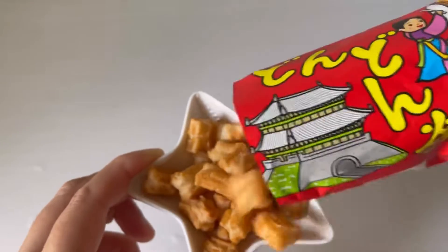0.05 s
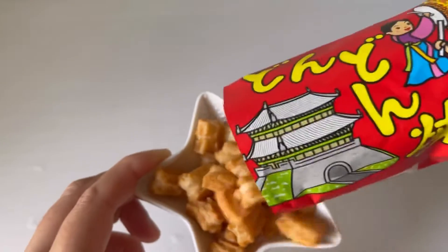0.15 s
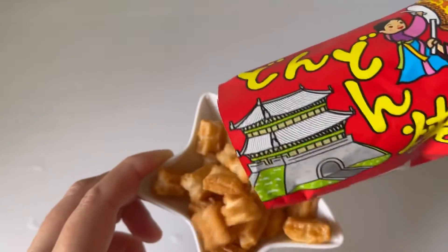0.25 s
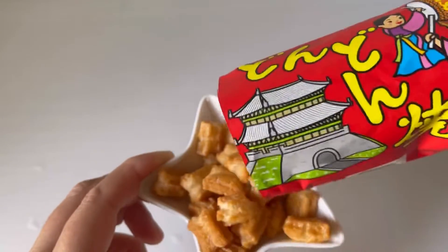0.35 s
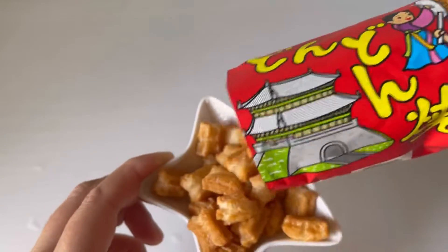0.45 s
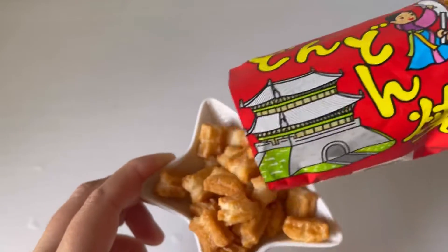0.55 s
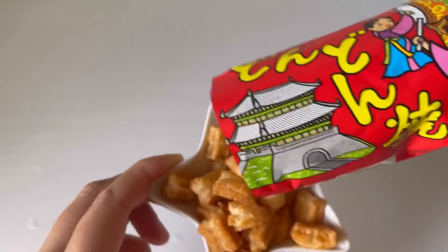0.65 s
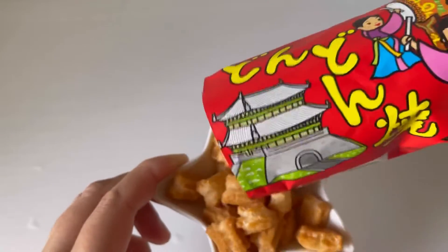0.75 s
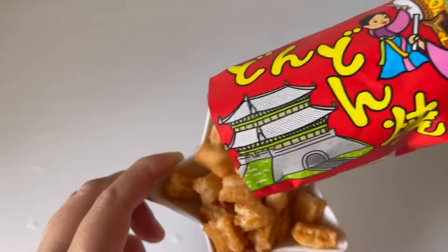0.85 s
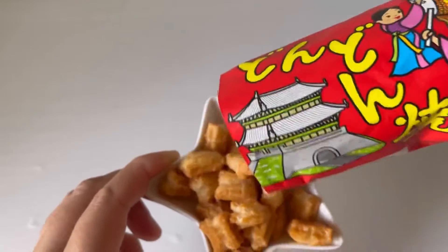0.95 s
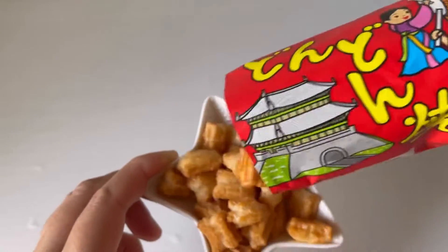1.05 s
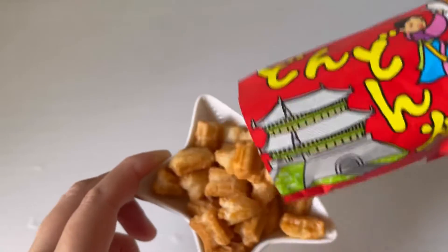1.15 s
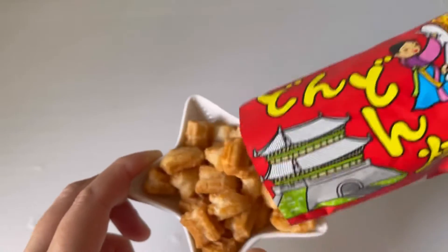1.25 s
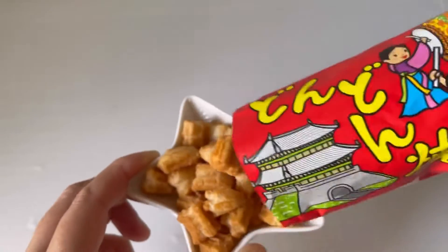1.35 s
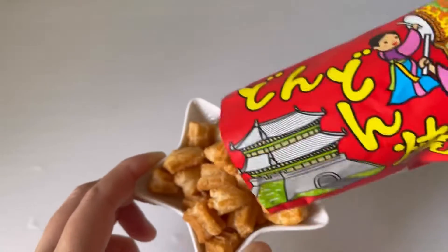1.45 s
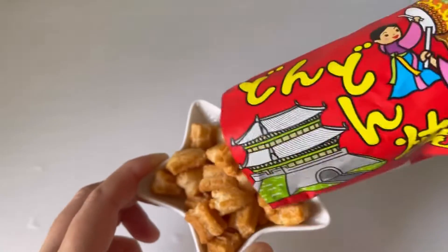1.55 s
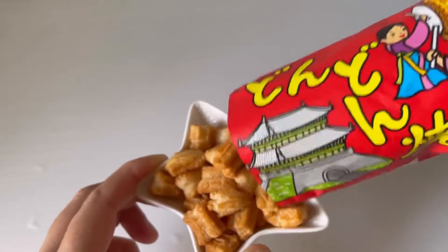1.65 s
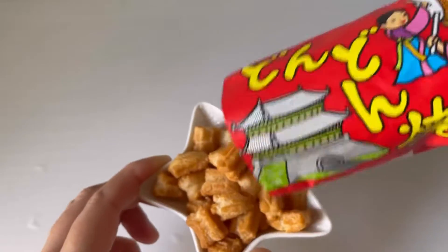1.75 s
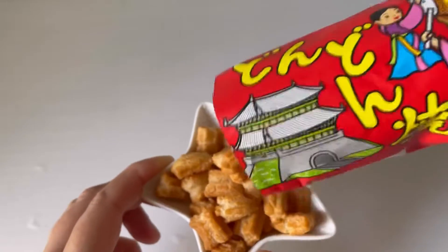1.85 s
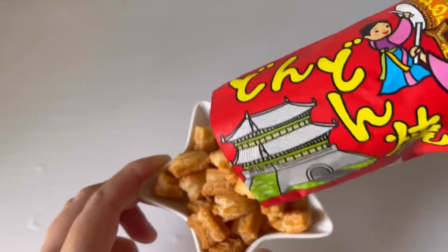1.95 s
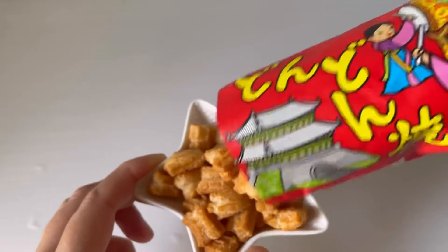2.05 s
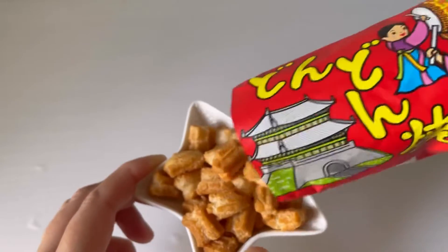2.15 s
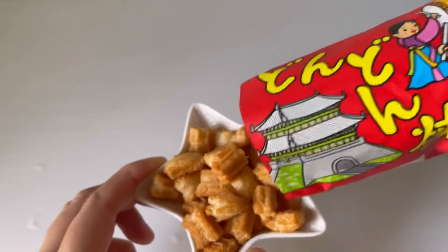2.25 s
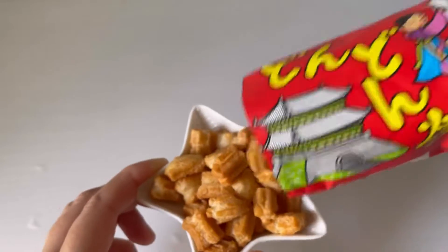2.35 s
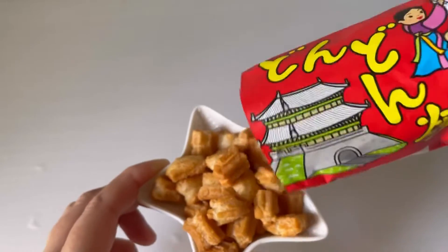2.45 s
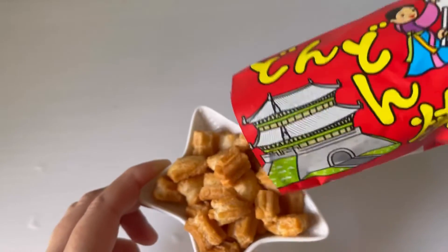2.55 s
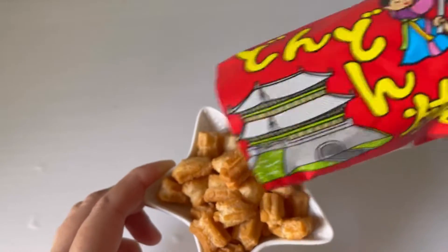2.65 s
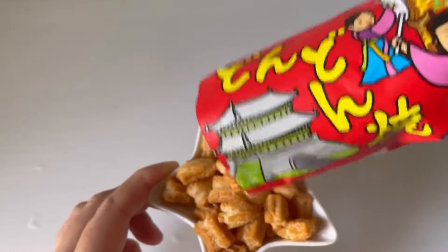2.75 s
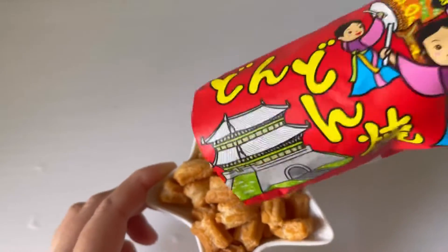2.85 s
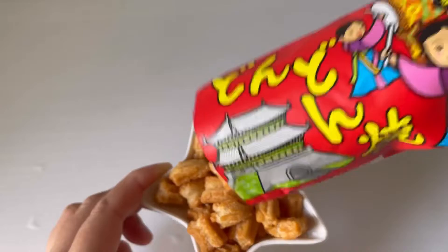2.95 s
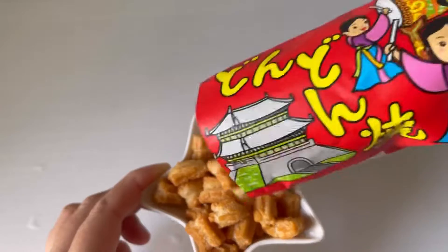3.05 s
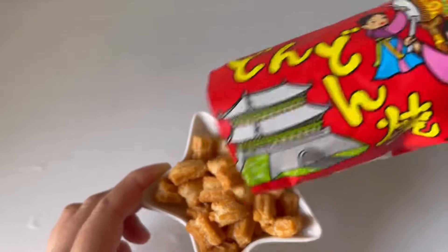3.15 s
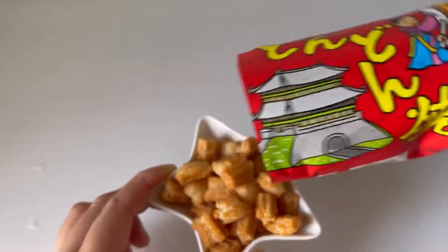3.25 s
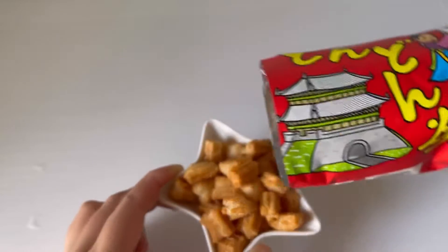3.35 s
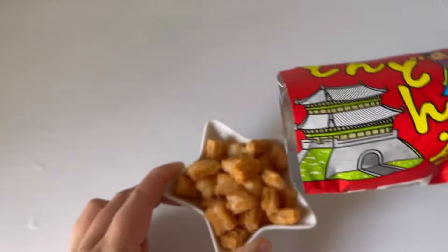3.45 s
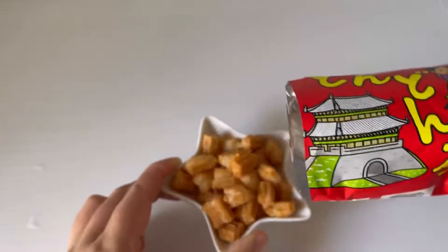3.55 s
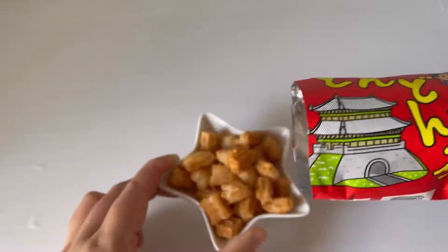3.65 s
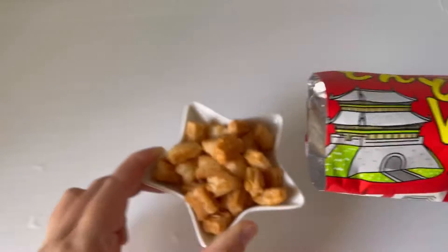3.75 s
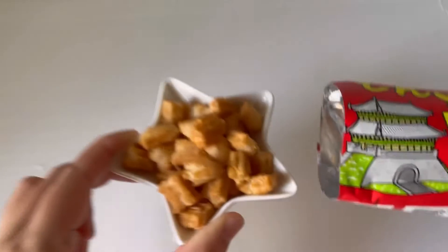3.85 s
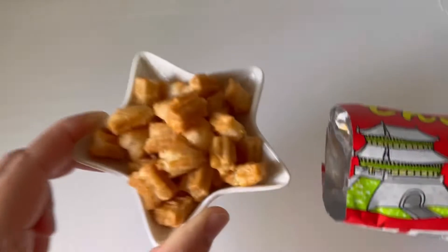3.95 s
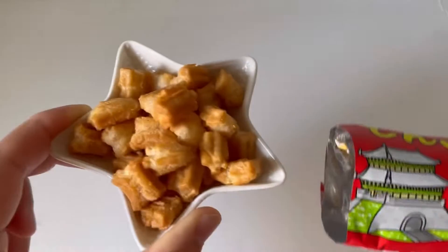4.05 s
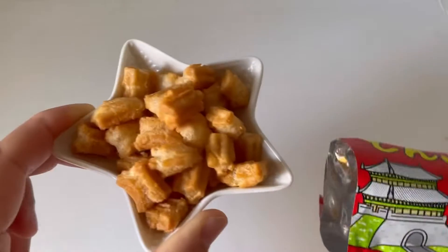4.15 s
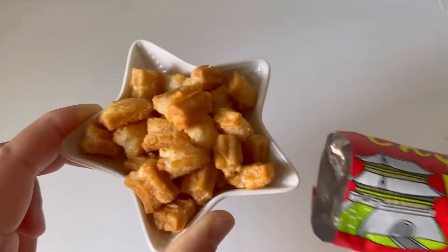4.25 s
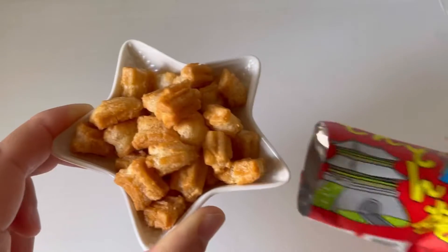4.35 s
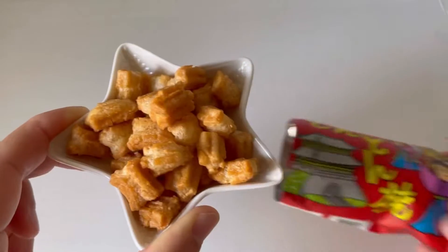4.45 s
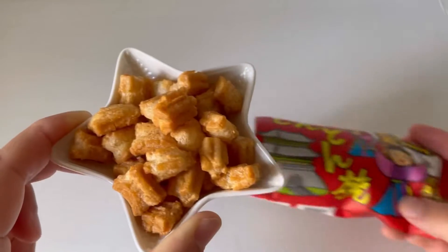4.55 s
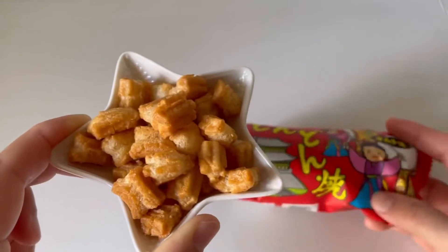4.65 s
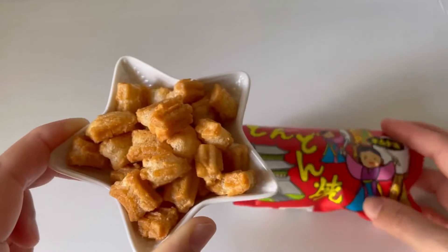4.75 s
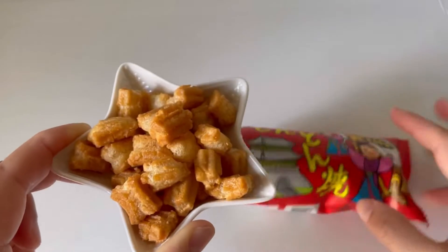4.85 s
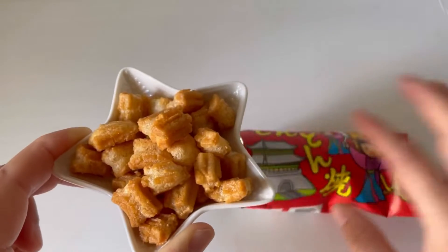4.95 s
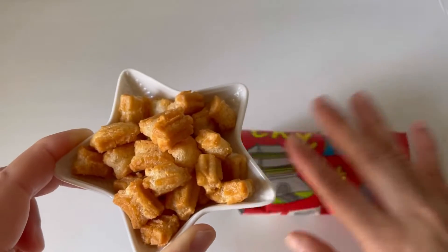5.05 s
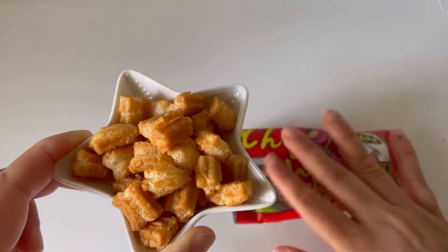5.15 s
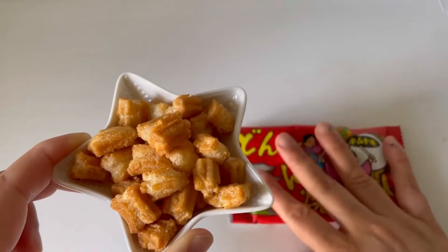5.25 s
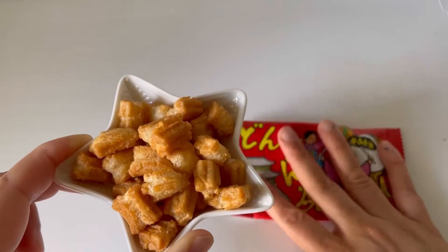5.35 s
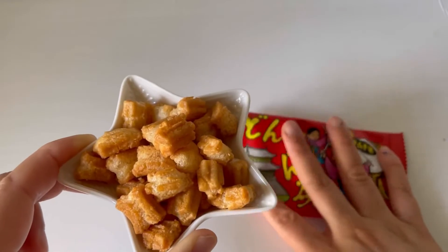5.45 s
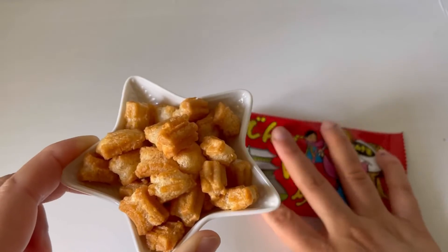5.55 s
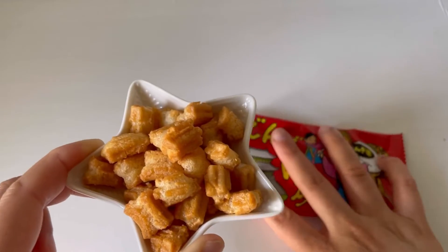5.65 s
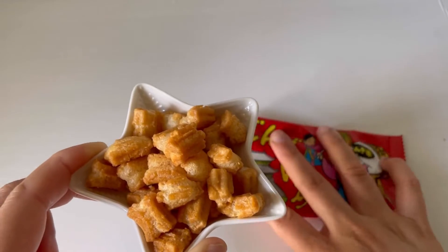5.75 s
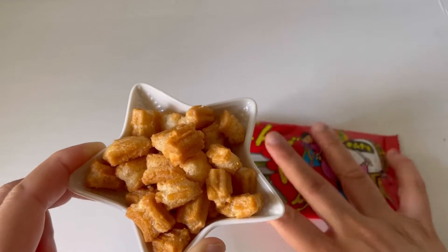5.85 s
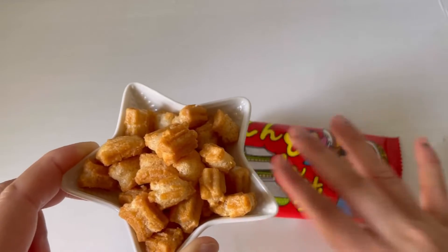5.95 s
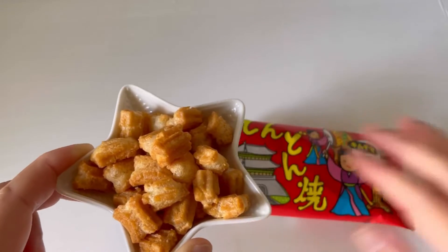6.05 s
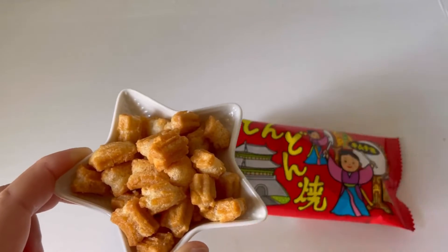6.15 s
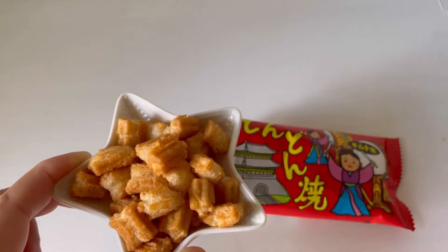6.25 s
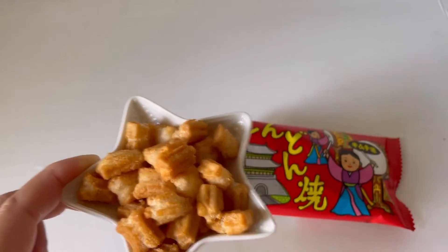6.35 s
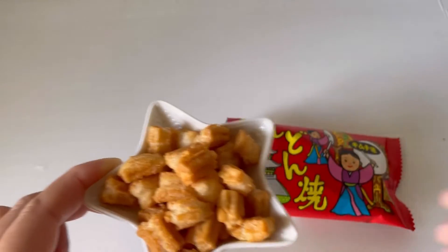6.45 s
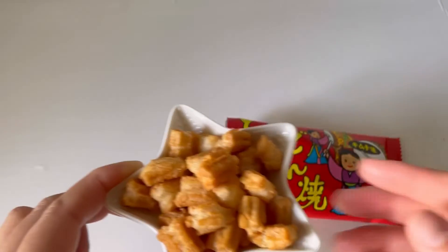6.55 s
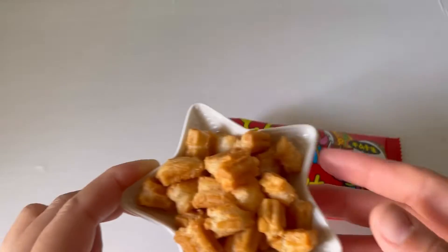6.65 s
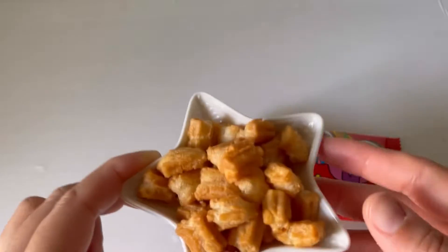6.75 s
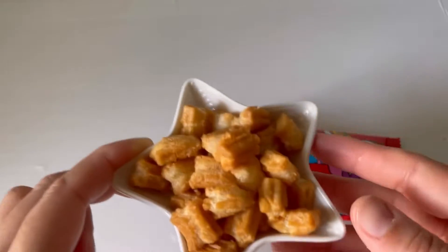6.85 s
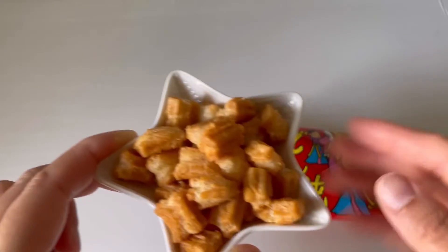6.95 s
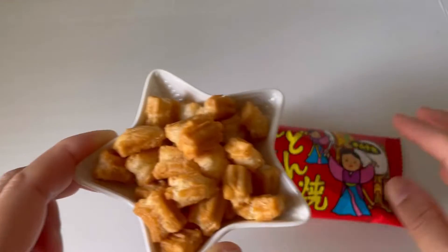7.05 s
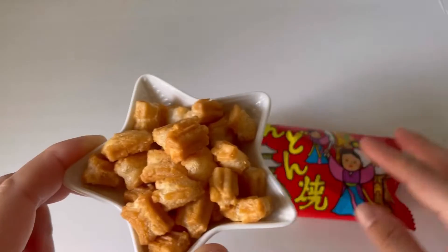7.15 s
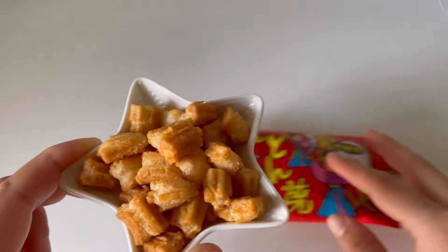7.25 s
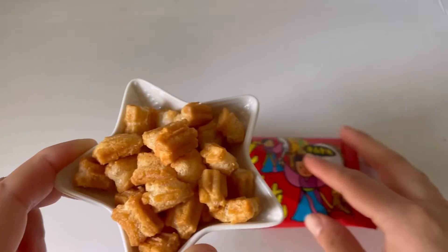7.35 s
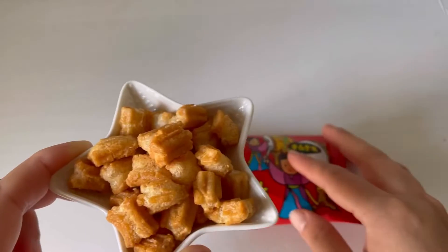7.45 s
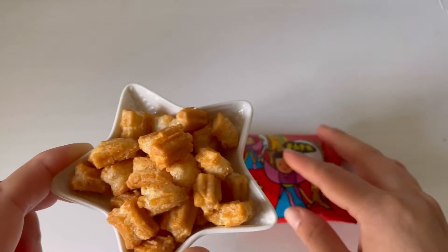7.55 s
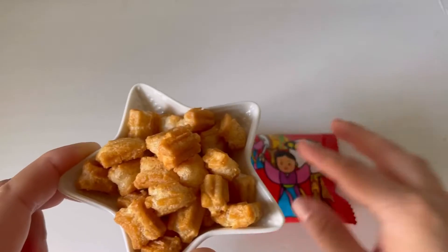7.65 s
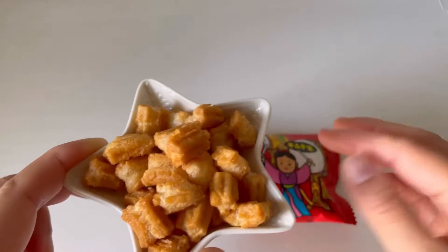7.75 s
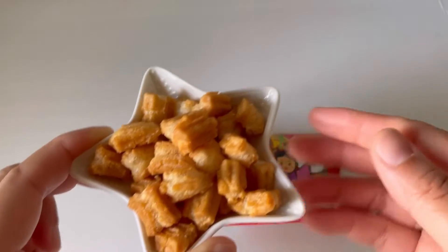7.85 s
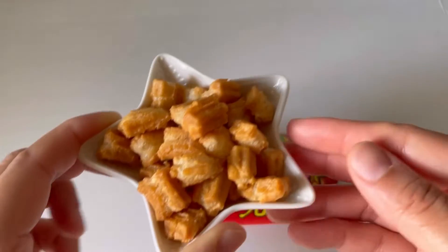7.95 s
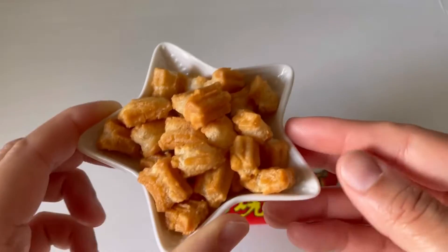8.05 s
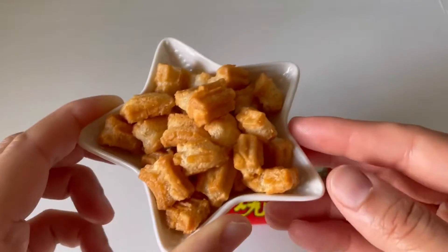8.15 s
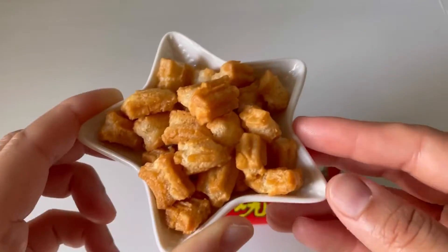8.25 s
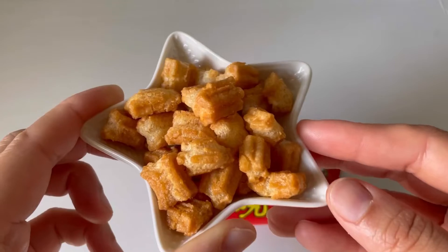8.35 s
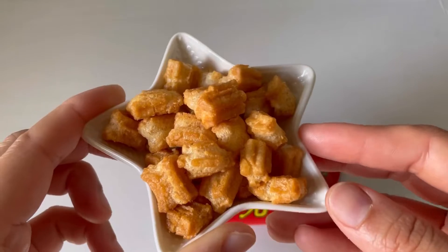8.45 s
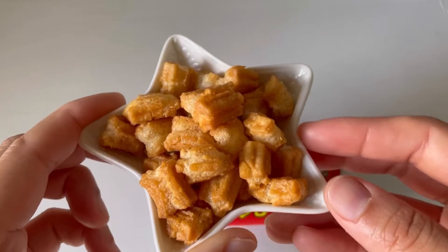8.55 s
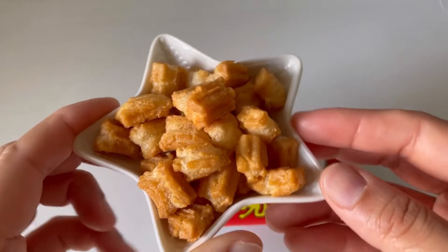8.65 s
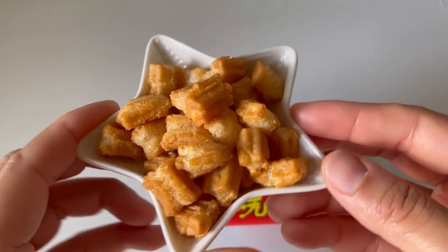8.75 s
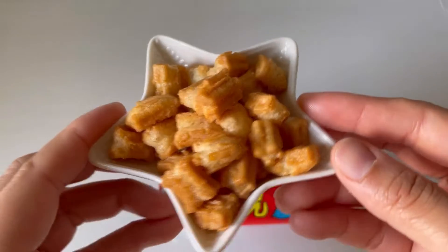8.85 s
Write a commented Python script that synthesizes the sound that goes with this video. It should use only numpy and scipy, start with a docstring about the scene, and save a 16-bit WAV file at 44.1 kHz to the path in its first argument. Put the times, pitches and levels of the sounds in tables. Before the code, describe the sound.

Crisp puffed crackers knock and slide softly from a plastic bag into a dish, then the empty bag crackles loudly as it is pressed flat.

```python
"""Crisp crackers knock and slide as they are shaken out of a plastic bag into a small dish.
Then the empty bag is laid on the table, pressed flat and pushed aside: creases snap, fingers tap the film dully.
Blows are bursts of noise with a ring, a broad body and a crack; rustle is many tiny ticks over a hiss.
Soft pushes draw short low tones from the table. Below it all lie short reflections and the noise and hums
of a quiet room. Two microphone ports listen from close by."""
import sys
import numpy as np
from scipy import signal
from scipy.fft import rfft, irfft, next_fast_len
from scipy.io import wavfile
from scipy.ndimage import uniform_filter1d

SR = 44100
rng = np.random.default_rng(int(sys.argv[2]) if len(sys.argv) > 2 else 0)


def wav_out(sig):
    """Save sig, one row per channel (or a flat mono array), as 16-bit PCM at SR to the path in sys.argv[1]."""
    wavfile.write(sys.argv[1], SR, np.round(np.clip(np.atleast_2d(sig).T, -1, 1) * 32767).astype(np.int16))


def voltage_ratio(decibels):
    """Convert decibels (scalar or array-like) to amplitude ratios, 20 dB per decade."""
    exponent = np.asarray(decibels, float) / 20
    return 10 ** exponent


N = 392049   # length of the scene in samples

# room noise, relative spectrum: (frequency [Hz], level per Hz [dB])
AIR_SPECTRUM = [(33, -34.5), (42, -13), (60, 1), (102, -8), (151, -16.5), (200, -19.5), (301, -17),
                (425, -23.5), (748, -25), (826, -21), (981, -29.5), (2320, -30.5), (3600, -38.5),
                (5500, -53.5), (9000, -57.5), (11000, -68), (12300, -48.5), (13300, -62), (14000, -76)]
# how alike the room noise is at the two ports: (frequency [Hz], likeness [0-1])
AIR_LIKENESS = [(60, 1.), (170, 0.87), (345, 0.83), (550, 0), (1200, .3), (1800, 0.4), (3000, 0.2),
                (6000, 0), (12000, 0)]
# wavering hums in the room: (frequency [Hz], width [Hz], rms level [dB])
ROOM_HUMS = [(49.8, 5, -57.5), (98.7, 3.9, -59.5), (146, 8.6, -69.5), (363.3, 17, -70)]
# hand and bag pushing on the table top; the level is the one from which the tone starts to die:
# (time [s], level [dB], frequency [Hz], time to die by 60 dB [s])
TABLE_THUMPS = [(4.813, -29, 368, 0.069), (4.828, -31, 138, .1), (5.24, -35, 140.8, 0.21),
                (5.369, -31.5, 135.5, 0.29), (5.529, -31, 136.5, 0.11), (7.13, -40, 139.9, 0.21)]
# shakes, pushes and rubs of the bag that make it rustle, and at the end a faint rub of a finger on the dish,
# before the added flutter: # (start [s], held [s], body level [dB], treble relative to body [dB])
BAG_MOVES = [(0.0, 0.19, -49, -2.5), (0.239, 0.13, -55, -1), (0.45, 0.14, -62.5, -3),
             (0.64, 0.22, -52.5, -4), (0.799, .1, -53, 0.5), (0.96, 0.25, -60, 0), (1.2, .13, -55.5, -5.5),
             (1.37, 0.095, -57.5, -2.5), (1.7, 0.031, -62.5, -8.5), (1.8, .03, -63, 0),
             (1.845, 0.075, -51.5, -5.5), (2.05, 0.12, -64, -5.5), (2.22, .15, -67, -2.5),
             (2.5, 0.093, -74, 0), (2.7, 0.017, -61, -5), (2.838, 0.015, -62, -4), (2.95, 0.034, -65, -6),
             (3.06, .02, -82, -1), (3.13, .03, -81, -2), (3.86, 0.037, -70.5, -1), (4.19, 0.069, -62, -6),
             (4.54, .01, -71.5, 1.5), (4.617, 0.11, -60, 1.5), (4.785, 0.13, -53.5, -4.5),
             (5.0, .01, -66.5, -3), (5.032, .02, -56.5, -4), (5.059, 0.076, -43, -9),
             (5.131, 0.11, -37, -7.5), (5.335, 0.05, -42, 0), (5.43, 0.15, -48.5, 0.5),
             (5.57, 0.11, -54, -8.5), (5.721, 0.19, -48, -3), (6.059, 0.13, -58, -4.5),
             (6.22, 0.14, -57, -11), (7.197, 0.12, -48, -2.5), (7.29, .12, -52, -3.5),
             (7.42, 0.059, -56.5, -4), (7.51, .015, -68.5, 2.5), (7.675, .01, -77.5, 1.5),
             (8.6, 0.033, -83.5, -5.5), (8.82, .07, -84, -3)]
# relative spectra of cracks and treble, of crackers and of film: (frequency [Hz], level per Hz [dB])
TREBLE_SPECTRUM = [(3500, -2), (5000, 1.5), (7000, -3), (9500, 3), (12500, -2.5), (13600, -6.5),
                   (14600, -13.5), (16000, -21.5)]
CRACKER_SPECTRUM = [(130, -4), (250, 2), (500, -4), (1000, -7), (1400, -4), (2100, -8), (3000, -7),
                    (4300, -30.5)]
FILM_SPECTRUM = [(150, -12.5), (300, -13.5), (600, -11.5), (1000, -10.5), (1500, -8.5), (2100, -9.5),
                 (3000, -13), (4300, -16)]
# the clearest snaps of the film's creases and dull finger taps on it, each level taken over its loudest 3 ms:
# (time [s], body rms level [dB], ring frequency [Hz], treble relative to body [dB])
FILM_SNAPS_AND_TAPS = [(3.924, -55.5, 1800, -4), (4.228, -55, 1910, -6), (4.237, -29.5, 1690, -14.5),
                       (4.451, -39, 955, -26), (4.62, -37.5, 1766, -3.5), (4.645, -38.5, 860, -14),
                       (4.785, -36, 1280, -6.5), (4.812, -28.5, 790, -10.5), (4.844, -33, 1578, -5.5),
                       (4.889, -39.5, 762, -7), (4.937, -44.5, 1499, -5), (5.051, -24.5, 1002, -20.5),
                       (5.084, -30.5, 1401, -9.5), (5.106, -27, 1217, -22.5), (5.118, -32, 1605, -14),
                       (5.124, -30, 1560, -13), (5.131, -21.5, 1250, -24.5), (5.141, -13, 1360, -10.5),
                       (5.164, -31, 1728, 2.5), (5.188, -21.5, 1010, 0), (5.204, -22.5, 3380, -2),
                       (5.218, -18.5, 1674, -9), (5.235, -27.5, 1710, -8.5), (5.241, -24.5, 1770, 1),
                       (5.259, -30.5, 1750, -9.5), (5.302, -41.5, 1370, -13.5), (5.325, -30, 1650, -14.5),
                       (5.341, -25, 1394, -7.5), (5.35, -23, 2200, 1), (5.365, -27, 840, -7.5),
                       (5.379, -25, 1778, 2), (5.405, -32.5, 3150, 9), (5.44, -28, 1820, 6),
                       (5.472, -34, 2230, -9.5), (5.482, -35.5, 1820, 1.5), (5.496, -29, 1395, 5),
                       (5.506, -28, 3200, 5), (5.535, -29, 3910, -6.5), (5.566, -41, 1806, -9),
                       (5.58, -37.5, 2230, 6.5), (5.609, -44, 1564, -10), (5.632, -29.5, 1780, -5.5),
                       (5.687, -47, 537, -20.5), (5.729, -35, 2280, 10), (5.765, -48, 1843, 8.5),
                       (5.777, -34, 3270, 9), (5.784, -34, 3330, 2), (5.801, -30, 1642, 4.5),
                       (5.811, -28, 1800, 1), (5.829, -34, 1800, -17), (5.845, -38, 1450, -2),
                       (5.86, -27.5, 1540, 0), (5.897, -44.5, 1480, -16), (5.92, -26, 2180, -5),
                       (5.995, -48, 1080, -10), (6.064, -27, 1450, 3), (6.077, -30, 1416, -10),
                       (6.112, -24.5, 1518, -6.5), (6.162, -44, 1056, -27.5), (6.224, -25.5, 1358, -0.5),
                       (6.309, -28.5, 1220, -14), (6.317, -34, 830, -37), (7.214, -43.5, 1370, -18),
                       (7.26, -40, 1440, -10), (7.302, -50.5, 1720, 7), (7.323, -40.5, 1500, -7.5),
                       (7.348, -34.5, 1330, -41), (7.44, -41.5, 1360, -28), (7.493, -49, 1070, -13),
                       (7.591, -45.5, 1450, -39.5), (7.61, -45, 1380, -39.5)]
# the clearest knocks of crackers on each other and on the bag, each level taken over its loudest 3 ms:
# (time [s], body rms level [dB], ring frequency [Hz], treble relative to body [dB])
CRACKER_KNOCKS = [(0.021, -36, 734, 0.5), (0.042, -33.5, 2800, -2.5), (0.082, -47, 2800, -10),
                  (0.113, -42.5, 2820, -2), (0.151, -51, 1300, -12), (0.18, -36, 1320, -27),
                  (0.2, -49, 2190, 5), (0.248, -54, 510, 3), (0.277, -51, 2450, -9),
                  (0.332, -47.5, 2940, 0), (0.353, -47.5, 2160, -4.5), (0.37, -42, 1210, -8),
                  (0.395, -52, 1220, -10), (0.435, -48, 1250, -11), (0.462, -44.5, 500, -2),
                  (0.495, -52, 1730, 1), (0.573, -52.5, 1040, -20), (0.654, -46, 1250, -7),
                  (0.673, -46.5, 1110, -26), (0.698, -45, 715, -24), (0.737, -40, 1230, -8.5),
                  (0.822, -45.5, 1690, -9), (0.881, -47.5, 1730, -3), (0.981, -49, 1360, -21),
                  (1.001, -48, 1640, -13), (1.069, -52.5, 1670, 3), (1.086, -51, 2740, -14),
                  (1.149, -51, 1180, 1), (1.218, -45.5, 1640, -16), (1.241, -54, 1400, -15),
                  (1.262, -44, 1700, -4.5), (1.303, -40.5, 500, -9), (1.426, -54, 510, -5),
                  (1.459, -53, 1230, 0), (1.717, -54.5, 1500, -1), (1.808, -56, 1680, -4),
                  (1.853, -52, 1300, -7), (1.864, -43, 500, -4), (1.899, -59, 510, 8),
                  (1.916, -42, 1750, -5), (2.054, -52, 510, -27), (2.123, -53, 1460, -4),
                  (2.201, -70, 2390, 7), (2.234, -61, 740, 1), (2.261, -47.5, 1630, -3.5),
                  (2.312, -58, 510, 3.5), (2.337, -73, 2000, 2), (2.355, -66.5, 2000, 4),
                  (2.376, -51.5, 2040, 9), (2.502, -60.5, 510, 3.5), (2.518, -62.5, 2900, 14),
                  (2.626, -59, 1350, -8), (2.713, -64, 2360, 5), (2.73, -51, 527, -3),
                  (2.849, -50.5, 1210, -7), (2.966, -59, 800, -6)]
# resonances of the microphone ports: (frequency [Hz], width [Hz], gain [dB])
PORT_RESONANCES = [(1170, 300, -0.5), (2230, 260, 1), (2800, 200, 2), (4794, 590, -6), (5470, 410, 3.5),
                   (11000, 1800, -0.5)]
# phase by which the left port leads the right: (frequency [Hz], lead [radians])
PORT_LEAD = [(60, -0.18), (130, -0.01), (300, 0.42), (600, 1.03), (1000, 0.48), (1500, -0.18), (2600, 0.5),
             (4200, 1), (4650, 1), (5100, 0.89), (5900, 0.74), (7200, 1), (8700, 3), (9700, 3.5),
             (10700, 3), (12000, 4.5), (13000, 5), (13800, 4.5), (16000, 10)]


def rms_one(x):
    """Scale to rms 1."""
    return x / np.sqrt(np.mean(x ** 2) + 1e-20)


def loudest_one(x):
    """Scale so that the loudest three milliseconds have rms 1."""
    return x / np.sqrt(uniform_filter1d(x ** 2, size=132).max())


def at_hz(points, hz):
    """Read a (frequency, value) table on a log frequency axis."""
    table_hz, values = np.array(points).T
    return np.interp(np.log(hz + 1), np.log(table_hz), values)


def colour(x, spectrum):
    """Shape the last axis by a spectrum that falls away steeply beyond its ends."""
    size = next_fast_len(x.shape[-1])
    hz = np.arange(size // 2 + 1) * SR / size
    closed = [(spectrum[0][0] / 2, -80), *spectrum, (spectrum[-1][0] * 1.3, -80)]
    return irfft(rfft(x, size) * voltage_ratio(at_hz(closed, hz)), size)[..., :x.shape[-1]]


def drift(rate):
    """Slow random wandering: points of spread 1, rate of them per second, joined by lines."""
    points = rng.standard_normal(4000)
    return np.interp(np.arange(N) * rate / SR, np.arange(len(points)), points)


def resonate(x, hz, width_hz):
    """Ring like a struck object: a two-pole resonance with gain 1 on top."""
    r = np.exp(-np.pi * width_hz / SR)
    feedback = [1, -2 * r * np.cos(2 * np.pi * hz / SR), r * r]
    return signal.lfilter(np.array([1, 0, -1]) * (1 - r * r) / 2, feedback, x)


def air():
    """Room noise arrives from all sides, most alike at both ports in the bass; the hums waver."""
    noise_db = -56.5   # rms level around which the noise drifts
    size = next_fast_len(N)
    alike = np.clip(at_hz(AIR_LIKENESS, np.arange(size // 2 + 1) * SR / size), 0, 1)
    mid, side = rfft(colour(rng.standard_normal((2, N)), AIR_SPECTRUM), size)
    # the side part enters the two ports with opposite signs
    both_ports = np.sqrt(1 + alike) * mid + np.sqrt(1 - alike) * side * [[1], [-1]]
    noise = irfft(both_ports, size)[:, :N]
    hums = sum(voltage_ratio(db) * rms_one(resonate(rng.standard_normal(N), hz, width_hz))
               for hz, width_hz, db in ROOM_HUMS)
    return voltage_ratio(noise_db + 2.7 * drift(3.6)) * rms_one(noise) + hums


def room(x):
    """Dense reflections are like noise that dies away, only partly alike at the two ports."""
    t60_s, wall_cut_hz = 0.21, 17640
    shared = 0.6   # likeness of the two tails
    t = np.arange(SR // 2) / SR
    tails = rng.standard_normal((2, len(t))) * voltage_ratio(-60 * t / t60_s) * (t > .003)
    tails = signal.sosfilt(signal.butter(1, wall_cut_hz, fs=SR, output="sos"), tails)
    tails = shared * tails[:1] + np.sqrt(1 - shared ** 2) * tails
    tails = tails / np.sqrt(np.sum(tails ** 2, axis=1, keepdims=True))
    return signal.fftconvolve(x[None], tails, axes=1)[:, :N]


def thumps():
    """The table top answers a soft push with a short low tone."""
    out, t = np.zeros(N), np.arange(N) / SR
    for s, level_db, hz, t60_s in TABLE_THUMPS:
        since = np.maximum(t - s, 0)
        soft_onset = 1 - np.exp(-since * hz / 2.5)
        out += voltage_ratio(level_db - 60 * since / t60_s) * soft_onset * np.sin(2 * np.pi * hz * since)
    return out


def movement():
    """Body and treble level of the rustle in dB: the loudest move at each moment."""
    # a rustle sets in before its start and dies after its hold
    swell_db_per_s, fade_db_per_s = 1301.5, 219.5
    t = np.arange(N)[::64] / SR
    s, held, body_db, treble_db = np.transpose(BAG_MOVES)[:, :, None]
    before_start = np.maximum(s - t, 0)
    after_hold = np.maximum(t - s - held, 0)
    shape = -swell_db_per_s * before_start - fade_db_per_s * after_hold
    return [np.repeat(np.max(db + shape, axis=0), 64)[:N] for db in (body_db, body_db + treble_db)]


def patches(ticks, count):
    """Ticks are dealt at random to small patches, each ringing a few cycles at its own pitch."""
    low_hz, high_hz, cycles = 605, 4070, 5.0
    dealt = rng.integers(0, count, N)
    out = np.zeros(N)
    for k, hz in enumerate(np.geomspace(low_hz, high_hz, count)):
        out += resonate(ticks * (dealt == k), hz, hz / cycles) / np.sqrt(hz)
    return rms_one(out)


def rustle():
    """Crackers and film rub in dense small ticks of uneven size, coming in clumps, over a smooth sliding hiss."""
    ticks_per_s, size_db = 2500, 4.5
    clump_db, clump_rate = 3.0, 70   # spread of the clumps, and their random points per second
    hiss_db, patch_ring_db = 0.5, -3   # both relative to the ticks
    body_db, treble_db = movement()
    sizes = voltage_ratio(size_db * np.minimum(rng.exponential(1, N), 4)) * rng.choice([-1, 1], N)
    ticks = rms_one(sizes * (rng.random(N) < ticks_per_s / SR))
    hiss = voltage_ratio(hiss_db) * rng.standard_normal(N)
    grain = voltage_ratio(clump_db * drift(clump_rate)) * (ticks + hiss)
    ringing = patches(voltage_ratio(clump_db * drift(clump_rate)) * ticks, count=10)
    rung = grain + voltage_ratio(patch_ring_db) * ringing
    pouring = np.arange(N) < 3.5 * SR   # crackers until 3.5 s, then the film alone
    body = np.where(pouring, rms_one(colour(rung, CRACKER_SPECTRUM)), rms_one(colour(rung, FILM_SPECTRUM)))
    treble = rms_one(colour(grain, TREBLE_SPECTRUM))
    # body and treble also flutter on their own, so that the colour keeps changing
    return voltage_ratio(body_db + 2.4 * drift(50)) * body + voltage_ratio(treble_db + 2.5 * drift(50)) * treble


def lesser(start_s, end_s, over_db, spread_db, longest_ms, count):
    """Lesser blows fall at random, their levels following the movement, each with its own pitch, edge and length."""
    low_ring_hz, ring_octaves, edge_spread_db = 500, 2, 13.5
    body_db, treble_db = movement()
    when, size, pitch, edge, swell, die = rng.random((count, 6)).T
    s = start_s + (end_s - start_s) * when
    at = (s * SR).astype(int)
    level_db = body_db[at] + over_db + spread_db * (size - .5)
    ring_hz = low_ring_hz * 2 ** (ring_octaves * pitch)
    crack_db = treble_db[at] - body_db[at] + edge_spread_db * (edge - .5)
    return list(zip(s, level_db, ring_hz, crack_db, longest_ms * swell ** 2, longest_ms * die))


def blows(events, material, width_hz, ring_db, treble_share):
    """Each blow is a burst of tiny slips that swells and dies: a ring at its own pitch, a broad body, a crack."""
    dull_share = 0.3   # a blow with little treble also has less broad body beside its ring (dB per dB)
    lead = 1280   # samples of room for the swell
    out, ms = np.zeros(N + 4 * lead), np.arange(-lead, 2 * lead) * 1000 / SR
    slips = rng.standard_normal((len(events), 2, 3 * lead))
    for (s, level_db, hz, crack_db, swell_ms, die_ms), (low, high) in zip(events, slips):
        # swell and die times each span 20 dB
        slope = np.where(ms < 0, 20 * ms / max(swell_ms, .3), -20 * ms / max(die_ms, 1))
        broad = colour(low * voltage_ratio(slope), material)
        ring = voltage_ratio(ring_db) * resonate(broad, hz, width_hz)
        body = voltage_ratio(dull_share * min(crack_db, 0)) * broad + ring
        # the crack swells and dies faster than the body
        crack = colour(high * voltage_ratio(slope / treble_share), TREBLE_SPECTRUM)
        blow = loudest_one(body) + voltage_ratio(crack_db) * loudest_one(crack)
        at = round(s * SR)
        out[at:at + len(ms)] += voltage_ratio(level_db) * blow
    return out[lead:lead + N]


def film_snaps_and_taps():
    """Creases in the film snap over, bright or dull, and fingers tap it dully; lesser blows join the clear ones."""
    swell_ms, die_ms = 2.9, 5.4
    film_blows = [(*row, swell_ms, die_ms) for row in FILM_SNAPS_AND_TAPS]
    film_blows += lesser(4.6, 6.9, over_db=2.5, spread_db=7, longest_ms=8, count=30)
    film_blows += lesser(7.2, 7.5, over_db=-3.5, spread_db=3, longest_ms=6.3, count=16)
    return blows(film_blows, FILM_SPECTRUM, width_hz=510, ring_db=8.0, treble_share=0.89)


def cracker_knocks():
    """Crackers hit each other and the bag and ring briefly; the clear knocks come with lesser ones."""
    swell_ms, die_ms = 6.6, 11.0
    knocks = [(*row, swell_ms, die_ms) for row in CRACKER_KNOCKS]
    knocks += lesser(0, 3.2, over_db=5.5, spread_db=2.5, longest_ms=6.9, count=70)
    return blows(knocks, CRACKER_SPECTRUM, width_hz=260, ring_db=9.0, treble_share=0.65)


def scene():
    """Crackers, bag and table close by, their reflections, and the room noise."""
    near = cracker_knocks() + film_snaps_and_taps() + rustle() + thumps()
    reflections = voltage_ratio(-15) * room(near)
    return near + reflections + air()


def roll_off(x):
    """The treble ends steeply here."""
    return signal.sosfilt(signal.butter(12, 16810, fs=SR, output="sos"), x)


def record(dry):
    """The ports colour the sound and shift left against right in phase."""
    size = next_fast_len(N + 4096)
    hz = np.arange(size // 2 + 1) * SR / size
    gain_db = sum(db / (1 + (2 * (hz - centre_hz) / width_hz) ** 2)
                  for centre_hz, width_hz, db in PORT_RESONANCES)
    # each port takes half of the lead, with opposite sign
    shift = np.exp(.5j * at_hz(PORT_LEAD, hz) * np.array([[1], [-1]]))
    mix = irfft(rfft(dry, size) * voltage_ratio(gain_db) * shift, size)[:, :N]
    return roll_off(mix)


dry = scene()
out = record(dry)
wav_out(out)
```